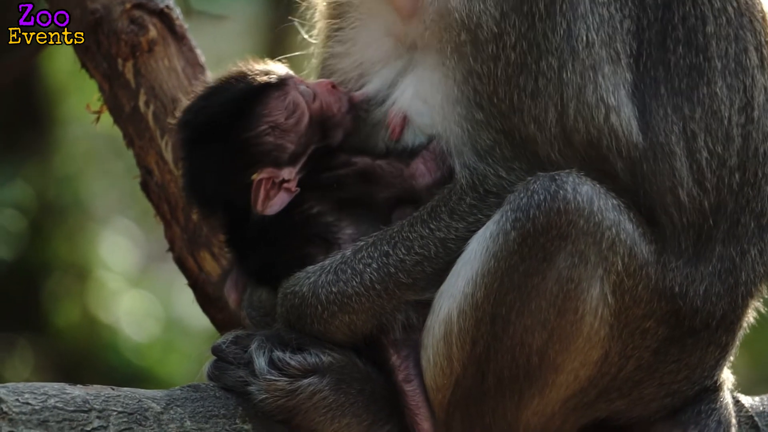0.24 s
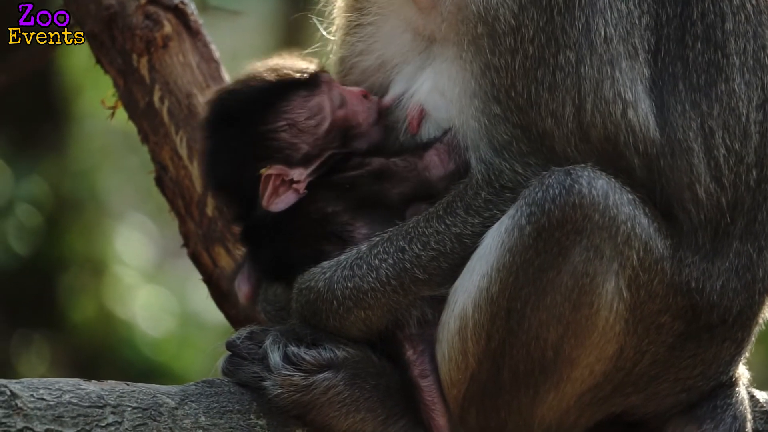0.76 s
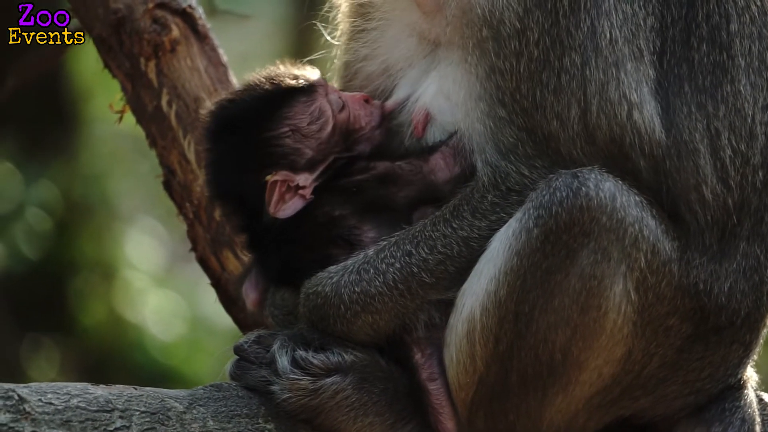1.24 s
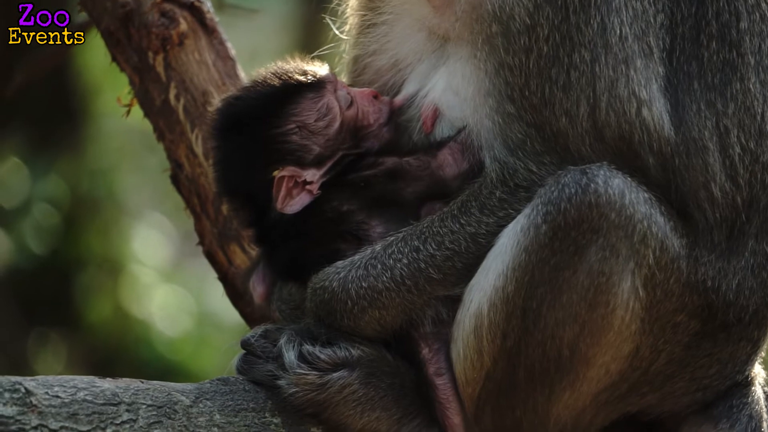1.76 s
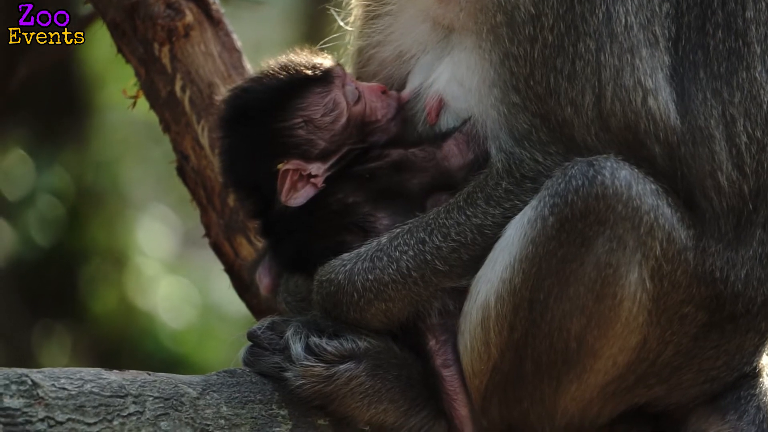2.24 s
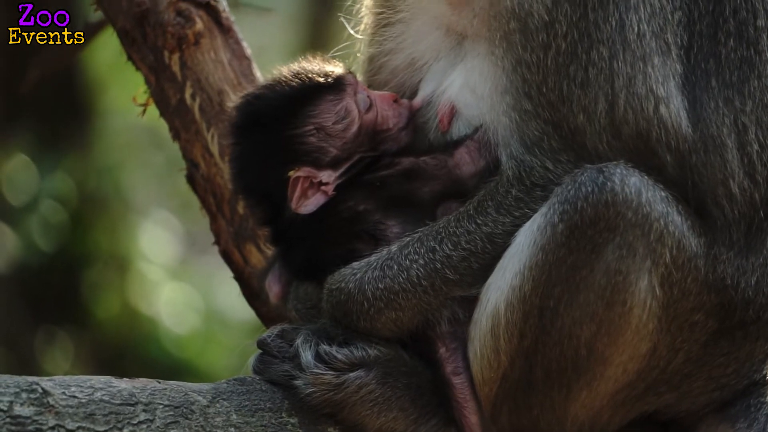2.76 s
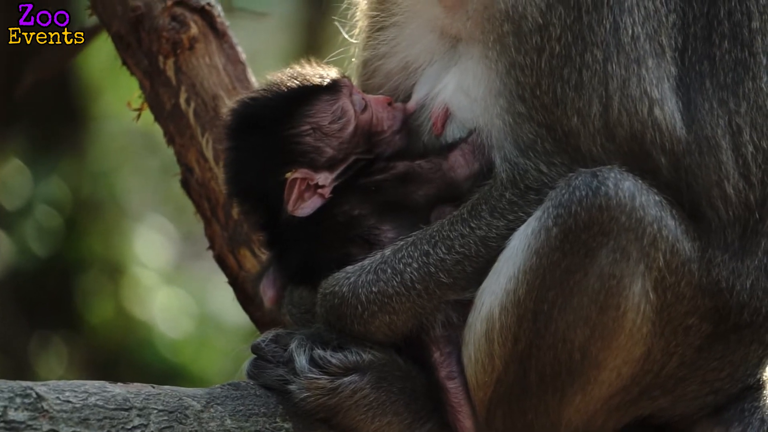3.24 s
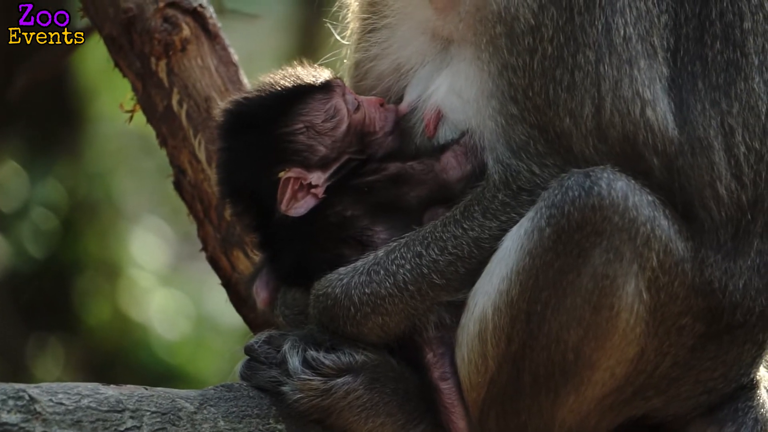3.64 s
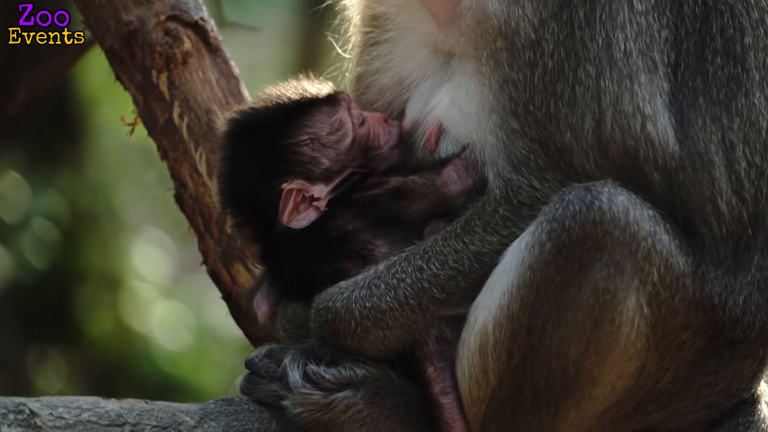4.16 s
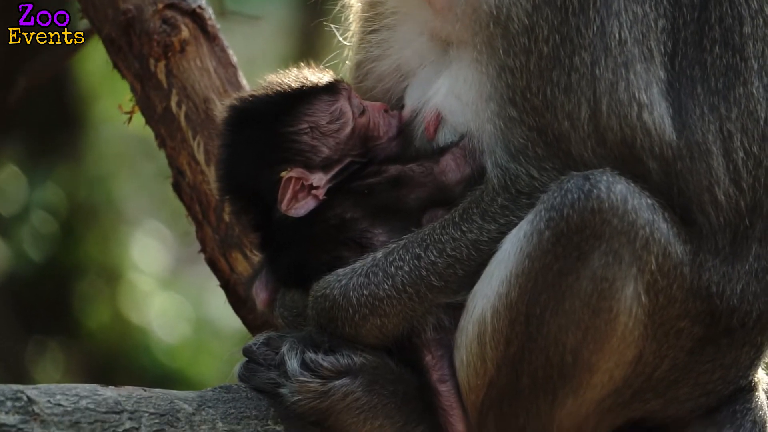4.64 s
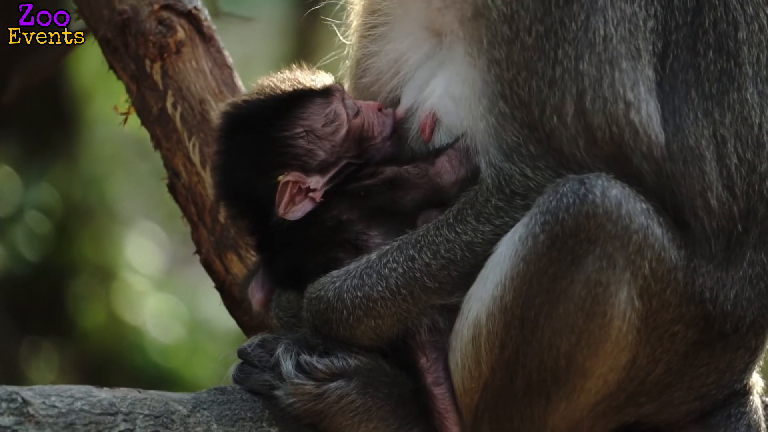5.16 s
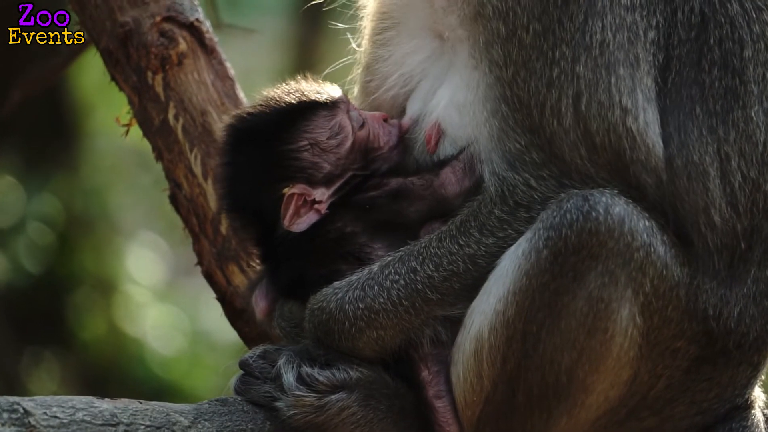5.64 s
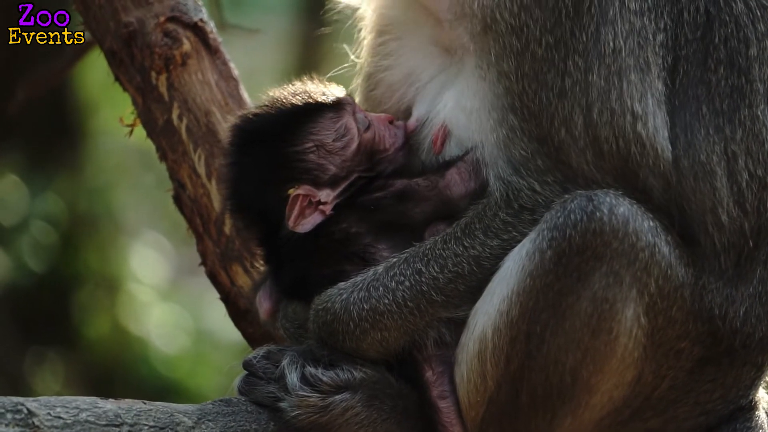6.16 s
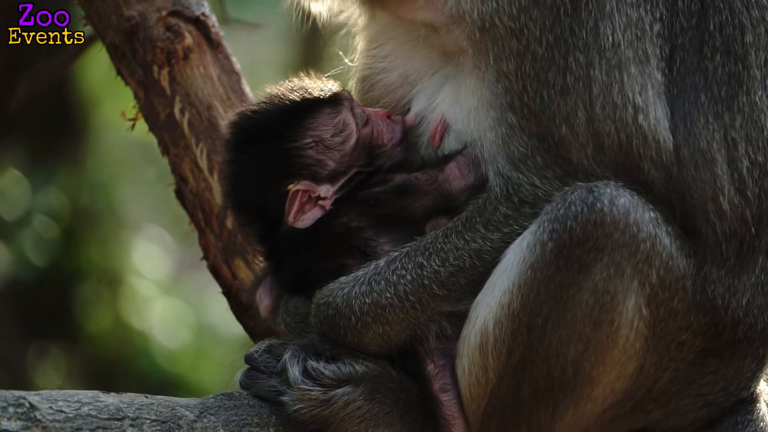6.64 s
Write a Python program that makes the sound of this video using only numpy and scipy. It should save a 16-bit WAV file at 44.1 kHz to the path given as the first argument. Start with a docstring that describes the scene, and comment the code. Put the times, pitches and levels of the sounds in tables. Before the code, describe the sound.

A wooded zoo enclosure heard through a camera microphone: soft distant air, steady treble hiss slightly stronger on the right, and a low, quick flutter of muffled knocks and rumble that varies in level. A faint chirp comes at 0.1 s, and a bird's thin upward slur at 0.4. At 0.6 a tiny squeal breaks into a monkey's loud, raspy, arched call, about a third of a second long, left of centre, ringing for about a second. Bird slurs return at 1.3, 2.3 and 4.5, with scattered far chirps, gruff barks to the right and soft hoots to the left from 1.6 to 2.9. The second harsh call comes at 3.4. A faint high motor whine appears on and off from 3.15 to 6.6. More small barks, chirps and hoots follow from 4.1 to 5.2, then hoarse distant wails overlap from 5.3 to 6.15. At 6.15 a squeal breaks into the third call, its echo fading to the end.

```python
"""Monkey calls in a wooded enclosure

A monkey gives three harsh, arched calls some way off in a wooded zoo enclosure that rings for about a second.
Far animals wail, hoot, bark and chirp: their voices, like the monkey's, are overtones and breath in a throat.
A small bird's upward slurs are gliding sine tones with an echo.
Outdoor air and microphone hiss are shaped noise; the camera adds a low flutter of knocks and rumble
and a thin sine whine that comes and goes."""
import sys
import numpy as np
from scipy import signal
from scipy.fft import rfft, irfft, next_fast_len
from scipy.io import wavfile
from scipy.ndimage import uniform_filter1d

SR = 44100
rng = np.random.default_rng(int(sys.argv[2]) if len(sys.argv) > 2 else 0)


def unload_wav(signal):
    """Save mono or channel-first audio to the path in sys.argv[1] as 16-bit WAV at rate SR, clipped to [-1, 1]."""
    wavfile.write(
        sys.argv[1],
        SR,
        np.round(np.clip(np.atleast_2d(signal).T, -1, 1) * 32767).astype(np.int16),
    )


N = 303981
T = np.arange(N) / SR  # seconds

# Colour of the far animals' throats: frequency_hz, relative_level_db
FAR_THROAT = [(500, -20), (780, -4), (1100, 0.5), (1380, 4), (1750, 8.5), (2000, 0), (2300, 3.5),
              (2800, -5.5), (3150, -30), (6000, -55)]


def undb(db):
    """Decibels to amplitude gain."""
    return 10 ** (np.asarray(db) / 20)


def unit(x):
    """Scale to rms 1."""
    return x / np.sqrt(np.mean(x ** 2))


def colour(x, points):
    """Filter by an outline of (Hz, dB) points, joined straight over log frequency."""
    hz, db = np.transpose(points)
    size = next_fast_len(x.shape[-1] + 2048)
    f = np.maximum(np.fft.rfftfreq(size, 1 / SR), 1)
    gain = undb(np.interp(np.log(f), np.log(hz), db))
    return irfft(rfft(x, size) * gain, size)[..., :x.shape[-1]]


def with_peaks(outline, peaks):
    """An outline with bell-shaped peaks and dips laid over it."""
    hz = np.arange(100, SR // 2, 10)
    knots, db = np.transpose(outline)
    db = np.interp(np.log(hz), np.log(knots), db)
    for centre, width, peak_db in peaks:
        db = db + peak_db * np.exp(-.5 * ((hz - centre) / width) ** 2)
    return np.transpose([hz, db])


def wander(size, rate, count=1024):
    """Random values joined by straight lines, rate of them a second."""
    return np.interp(np.arange(size) / SR * rate, np.arange(count), rng.standard_normal(count))


def pan(x, pan_db):
    """Share a sound between the channels, left louder than right by pan_db."""
    return x * undb(np.array([[pan_db], [-pan_db]]) / 2)


def diffuse(size, side_db):
    """Stereo noise from all round: a shared part and a part opposed left and right."""
    mid, side = rng.standard_normal((2, size))
    return unit(mid + undb(side_db) * side * np.array([[1], [-1]]))


def enclosure(x, direct_db, wet_db, t60_s, treble_t60_s, build_s, side_db, pan_db, lag_count):
    """Straight sound, lag_count samples later on the right, plus a swelling, dying scatter from trunks and walls."""
    t = T[:int(1.5 * SR)]
    scatter = diffuse(len(t), side_db)
    low = colour(scatter, [(1500, 5.5), (4500, -43)])
    treble = scatter - low
    tail = low * undb(-60 * t / t60_s) + treble * undb(-60 * t / treble_t60_s)
    tail *= 1 - np.exp(-t / build_s)
    tail /= np.sqrt(np.sum(tail ** 2) / 2)
    straight = pan(np.array([x, np.roll(x, lag_count)]), pan_db)
    scattered = signal.fftconvolve(x[None], tail, axes=1)[:, :N]
    return undb(direct_db) * straight + undb(wet_db) * scattered


def voice(rows, throat, jitter=0.0588, jitter_rate=420, shimmer=1.0, rasp=0.97, rattle=0.12, rattle_hz=110):
    """Vocal folds through a throat; roughness unsettles pitch and strength and adds air that puffs each cycle."""
    times, *columns = np.transpose(rows)
    on = (T >= times[0]) & (T < times[-1])
    hz, db, rough, bright = (np.interp(T[on], times, column) for column in columns)
    size = len(hz)
    unsteady_hz = hz * (1 + jitter * rough * wander(size, jitter_rate))
    phase = 2 * np.pi * np.cumsum(unsteady_hz) / SR
    k = np.arange(1, int(SR / 4 / hz.max()) + 1)[:, None]  # overtone numbers
    # brightness tilts the overtones up to 3500 Hz and holds level above
    octaves = np.log2(np.minimum(k * hz, 3500) / hz)
    gains = undb(bright * octaves)
    # the ringing throat shifts each overtone in time, which smears the pulses
    overtones = (gains * np.sin(k * phase - k ** 2 / 2)).sum(0)
    folds = overtones / np.sqrt((gains ** 2).sum(0))
    air = (1 + np.cos(phase)) * np.resize(rng.standard_normal(SR), size)
    source = folds * (1 + shimmer * rough * wander(size, 260)) + rasp * rough * air
    rattling = source * (1 + rattle * rough * wander(size, rattle_hz))
    sound = colour(rattling, throat)
    # the effort, not the throat, sets the loudness: even out the power over 40 ms
    power = uniform_filter1d(sound ** 2, size=SR // 25)
    out = np.zeros(N)
    out[on] = sound / np.sqrt(power) * undb(db) * signal.windows.tukey(size, .05)
    return out


def arch(call, attack_s, release_s, release_db, rise_power, fall_power,
         opening_dull_db, closing_dull_db, edge_rough, count=96):
    """One cry as rows of (s, Hz, dB, roughness, brightness): pitch and mouth move to a crest and away again."""
    start, crest, end, start_hz, crest_hz, end_hz, db, rough, bright = call
    t = np.linspace(start, end, count)
    before = np.clip((crest - t) / (crest - start), 0, 1) ** rise_power
    after = np.clip((t - crest) / (end - crest), 0, 1) ** fall_power
    hz = crest_hz + (start_hz - crest_hz) * before + (end_hz - crest_hz) * after
    attack = 20 * np.log10(np.maximum(1 - np.exp((start - t) / attack_s), .05))
    release = release_db * np.clip(1 - (end - t) / release_s, 0, 1)
    # edge_rough below 1 makes the middle the roughest
    strain = edge_rough + (1 - edge_rough) * np.sin(np.pi * (t - start) / (end - start))
    brightness = bright - opening_dull_db * before - closing_dull_db * after
    return np.transpose([t, hz, db + attack + release, rough * strain, brightness])


def hiss():
    """Distant outdoor air that swells a little, under even microphone hiss that is stronger on the right."""
    # Shape of the outdoor air: frequency_hz, relative_level_db (per Hz)
    air_shape = [(150, -15.5), (250, -10.5), (682, -7.5), (773, -6.5), (889, -6.5), (1890, -7.5),
                 (2110, -9), (2290, -9), (7000, -19), (9100, -23), (15400, -120)]
    # Shape of the microphone's treble hiss: frequency_hz, relative_level_db (per Hz)
    treble_shape = [(6500, -22), (7500, -10), (8500, -2), (9400, -7.5), (10300, 0), (11100, -4),
                    (11800, -14.5), (12700, -17), (13000, -14), (13500, -20), (14500, -16.5), (15700, -22)]
    air = unit(colour(diffuse(N, 1), [(30, -34)] + list(air_shape)))
    air = air * undb(-58.0 + .5 * wander(N, 3.75))
    treble = unit(colour(diffuse(N, 1), [(3000, -64)] + list(treble_shape)))
    return air + pan(undb(-60.5) * treble, -7.0)


def camera_motor(ring_hz=118, ring_s=0.011, scatter=0.89, rumble_db=-1):
    """Near-regular knocks thud in the camera body over rumble; a thin, unsteady whine swells up and cuts off."""
    # Level of the low flutter: time_s, level_db
    flutter_levels = [(0.0, -62.5), (0.44, -65), (2.63, -65), (2.74, -75), (2.94, -65.5), (3.45, -70),
                      (3.47, -77), (3.76, -63.5), (3.97, -75), (4.2, -67), (6.06, -66), (6.89, -69)]
    # Motor whine: start_s, end_s, speed (share of full), level_db (before its wavering)
    whines = [(3.15, 3.55, 1, -64.5), (3.88, 4.09, 1, -70), (4.22, 4.4, 1, -70), (5.22, 5.35, .881, -66.5),
              (5.41, 5.6, 1, -70), (5.9, 6.6, 1, -64.5)]
    beat_hz, full_speed_hz, swell_s = 19.4, 4535, 0.12

    beats = np.arange(.012, T[-1], 1 / beat_hz)
    chance = rng.standard_normal((len(beats), 2))
    places = np.clip((beats + .002 * chance[:, 0]) * SR, 0, N - 1).astype(int)
    knocks = np.zeros(N)
    knocks[places] = 1 + scatter * chance[:, 1]
    t = T[:SR // 10]
    body_ring = np.exp(-t / ring_s) * np.sin(2 * np.pi * ring_hz * t)
    thuds = signal.fftconvolve(knocks, body_ring)[:N]
    thuds = unit(colour(thuds, [(30, -29), (90, 1.0), (200, -0.5), (500, 2)]))
    rumble = unit(colour(rng.standard_normal(N), [(20, -44), (45, -24), (75, -9.0), (110, 1.5),
                                                  (160, -1.0), (250, -6.5), (400, -22.5), (1500, -37)]))
    flutter_db = np.interp(T, *np.transpose(flutter_levels))
    flutter = unit(thuds + undb(rumble_db) * rumble) * undb(flutter_db)

    whine = 0
    for start, end, speed, db in whines:
        swell = np.tanh(np.maximum(T - start, 0) / swell_s)
        gate = np.clip((end - T) / 0.0088, 0, 1) * swell
        whine = whine + undb(db) * gate * np.sin(2 * np.pi * speed * full_speed_hz * T)
    return flutter + whine * undb(2.6 * wander(N, 25))


def short_calls(calls, rough, bright_db, pan_db, edge_db=-9):
    """One far caller's swelling, fading glides; returns the sound and what its direction adds left and right."""
    dry = 0
    for start, length, hz0, hz1, db in calls:
        swell = [(start, hz0, db + edge_db),
                 (start + length / 2, (hz0 + hz1) / 2, db),
                 (start + length, hz1, db + edge_db)]
        rows = [(*point, rough, bright_db) for point in swell]
        dry = dry + voice(rows, FAR_THROAT, jitter=0.187, rasp=0.84)
    return dry, pan(dry, pan_db) - dry


def far_animals():
    """Overlapping wails and scattered hoots, barks and chirps, much of them heard by way of the trees."""
    # Hoarse arched wails: start_s, crest_s, end_s, start_pitch_hz, crest_pitch_hz, end_pitch_hz,
    # level_db (before the enclosure), roughness (0-1), brightness (dB per octave)
    wail_rows = [(5.323, 5.394, 5.49, 779, 878, 809, -49.5, 0.57, 0.5),
                 (5.5, 5.64, 5.8, 824, 968, 905, -52, 0.69, 4),
                 (5.638, 5.697, 5.82, 1018, 1170, 1123, -45.5, 0.28, -5),
                 (5.84, 5.919, 6.15, 846, 954, 949, -48, 0.54, 8),
                 (5.84, 5.869, 6.14, 1067, 1074, 949, -48.5, 0.42, -11)]
    # Soft, pure hoots to the left: start_s, length_s, start_hz, end_hz, level_db (before the enclosure)
    hoots = [(2.354, 0.064, 856, 944, -60), (2.862, 0.068, 790, 772, -59), (4.865, .06, 793, 950, -60),
             (4.918, 0.047, 785, 763, -58)]
    # Gruff barks to the right: start_s, length_s, start_hz, end_hz, level_db (before the enclosure)
    barks = [(1.717, 0.1, 1103, 1136, -48.5), (1.76, 0.067, 784, 754, -55),
             (4.128, 0.085, 1230, 1131, -49.5), (5.17, 0.078, 1048, 1170, -61)]
    # Thin chirps about ahead: start_s, length_s, start_hz, end_hz, level_db (before the enclosure)
    chirps = [(.071, 0.08, 1936, 1900, -58.5), (1.562, 0.038, 2720, 2224, -49.5),
              (1.69, 0.093, 2580, 2494, -61), (1.862, 0.089, 1547, 1637, -59),
              (2.021, 0.083, 1806, 1995, -57), (2.526, 0.057, 2140, 2600, -56),
              (4.338, 0.0607, 2600, 2500, -63), (4.892, 0.13, 2286, 2360, -59.5)]
    wails = 0
    for wail in wail_rows:
        cry = arch(wail, attack_s=0.012, release_s=0.059, release_db=-9, rise_power=1.825, fall_power=1.2,
                   opening_dull_db=4.0, closing_dull_db=8.5, edge_rough=1.0)
        wails = wails + voice(cry, FAR_THROAT, jitter=0.101, rasp=0.44, rattle=0.63)
    calls, sides = zip(short_calls(hoots, rough=0.056, bright_db=-37, pan_db=12.5),
                       short_calls(barks, rough=0.503, bright_db=-14.5, pan_db=-9.5),
                       short_calls(chirps, rough=.13, bright_db=-10, pan_db=1.5))
    among_trees = enclosure(wails + sum(calls), direct_db=-2.0, wet_db=0.0, t60_s=1.0, treble_t60_s=1.0,
                            build_s=0.0074, side_db=-0.5, pan_db=0.5, lag_count=4)
    return sum(sides) + among_trees


def bird():
    """A thin sine whistle that dips and then sweeps upward, swelling as it climbs, with an echo."""
    # Slurs: start_s, level_db (before the swell, wavering and enclosure)
    slurs = [(.43, -58), (1.295, -60.5), (2.295, -59), (4.48, -61.5)]
    length_s, low_hz, high_hz = .18, 3750, 5350
    dry = 0
    for start, db in slurs:
        u = np.clip((T - start) / length_s, 0, 1)  # share of the slur sung
        hz = low_hz + (high_hz - low_hz) * np.interp(u, [0, .3, .55, 1], [.45, 0, .25, 1])
        swell = np.sin(np.pi * u) * u
        whistle = np.sin(2 * np.pi * np.cumsum(hz) / SR)
        dry = dry + undb(db + 2 * wander(N, 60)) * swell * whistle
    return enclosure(dry, direct_db=-2.5, wet_db=-2.5, t60_s=.7, treble_t60_s=.6,
                     build_s=.01, side_db=0, pan_db=0, lag_count=0)


def monkey(squeal_swell_db=9):
    """Three harsh calls left of centre; in two the voice breaks out of a swelling squeal."""
    # Broad colour of the near throat: frequency_hz, relative_level_db
    throat_outline = [(430, -38.5), (620, -22), (780, -1), (930, -0.5), (1100, 5.5), (1350, 3.5),
                      (1600, -9), (2050, 0.5), (2500, 9), (3300, -4.5), (4200, -13.5), (4900, -25.5),
                      (7000, -37.5), (13000, -54)]
    # Peaks and dips on that colour: centre_hz, width_hz, height_db
    throat_peaks = [(801, 27, 8), (910, 48, 1.5), (1025, 27, 2.5), (1323, 42, 4), (1988, 51, 5.5),
                    (2660, 250, -3.5), (3270, 95, 1.5), (5290, 110, 5.5), (6290, 370, 4)]
    # Loud calls, each one arch of effort: start_s, crest_s, end_s, start_pitch_hz, crest_pitch_hz,
    # end_pitch_hz, level_db (before the enclosure), roughness (0-1), brightness (dB per octave), attack_s
    loud_calls = [(.611, 0.734, .96, 379, 437.9, 336, -26.5, 0.4, 10.5, 0.052),
                  (3.411, 3.596, 3.8, 379.6, 441.7, 344.6, -26, .64, 10, 0.11),
                  (6.186, 6.306, 6.55, 397, 426.7, 312.6, -28, 0.51, 9, 0.013)]
    # Clear rising squeals, about an octave up, before the voice breaks into a call:
    # start_s, end_s, start_pitch_hz, end_pitch_hz, final_level_db (before the enclosure), roughness (0-1)
    squeals = [(.598, 0.626, 772, 884, -39, 0.37), (6.142, 6.19, 798, 857, -33.5, 0.21)]
    throat = with_peaks(throat_outline, throat_peaks)
    dry = 0
    for *call, attack_s in loud_calls:
        cry = arch(call, attack_s, release_s=0.11, release_db=-12.5, rise_power=1.4, fall_power=1.6,
                   opening_dull_db=7, closing_dull_db=15, edge_rough=0.51)
        dry = dry + voice(cry, throat, rattle=.45)
    for start, end, hz0, hz1, db, rough in squeals:
        squeal = [(start, hz0, db - squeal_swell_db, rough, 0), (end, hz1, db, rough, 0)]
        dry = dry + voice(squeal, throat)
    return enclosure(dry, direct_db=-0.5, wet_db=0.5, t60_s=0.93, treble_t60_s=0.76,
                     build_s=0.0017, side_db=-0.5, pan_db=5.3, lag_count=5)


def scene():
    """Everything that sounds, left and right, from the background to the monkey."""
    return hiss() + camera_motor() + far_animals() + bird() + monkey()


def record(dry):
    """The recorder cuts the top steeply above 15.7 kHz."""
    top_hz = 15700
    return signal.sosfilt(signal.ellip(10, .2, 70, top_hz, fs=SR, output="sos"), dry)


dry = scene()
out = record(dry)
unload_wav(out)
```